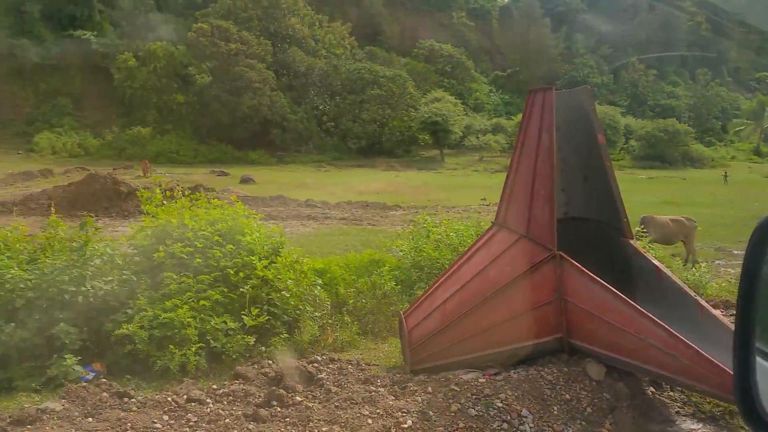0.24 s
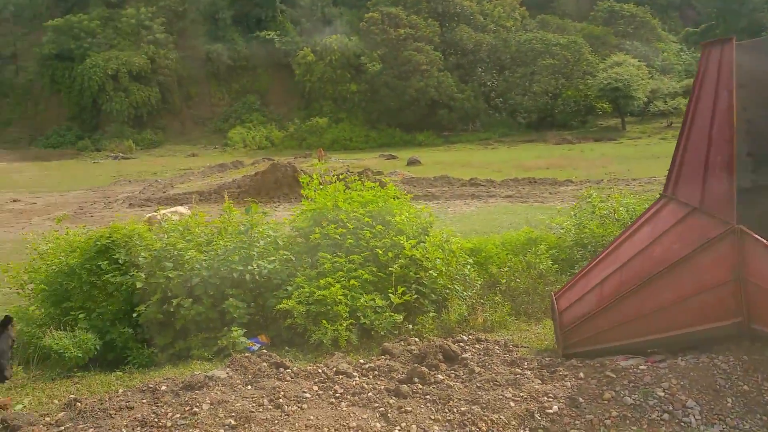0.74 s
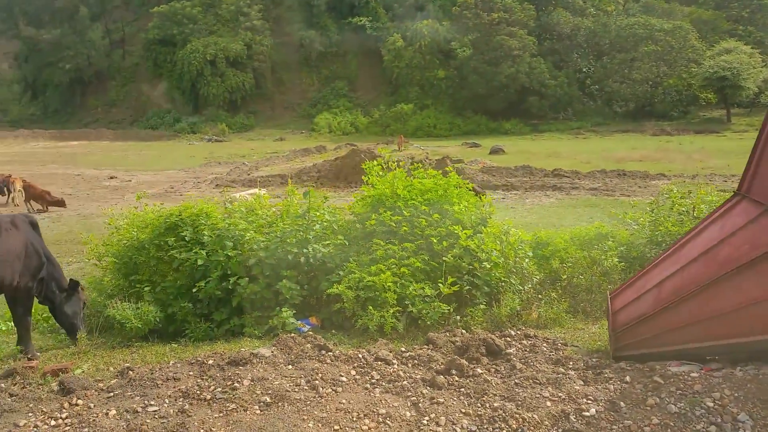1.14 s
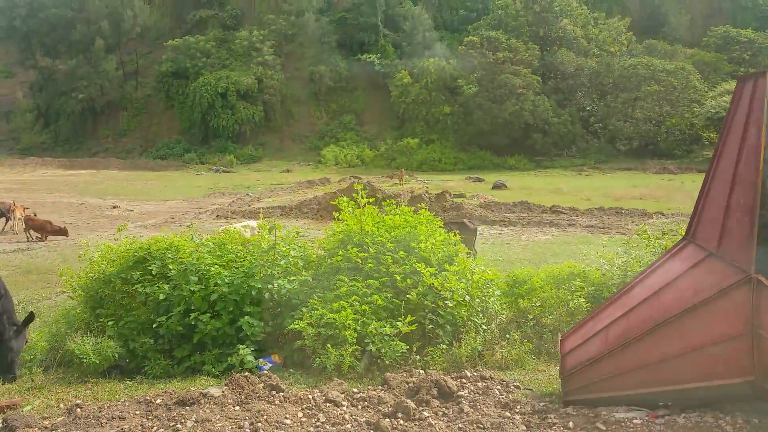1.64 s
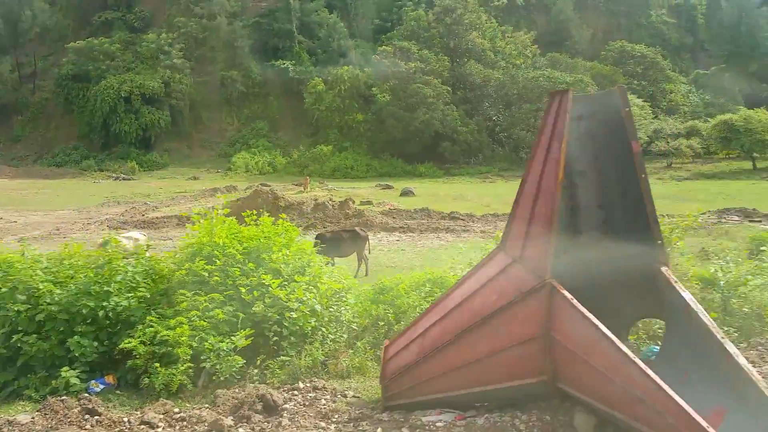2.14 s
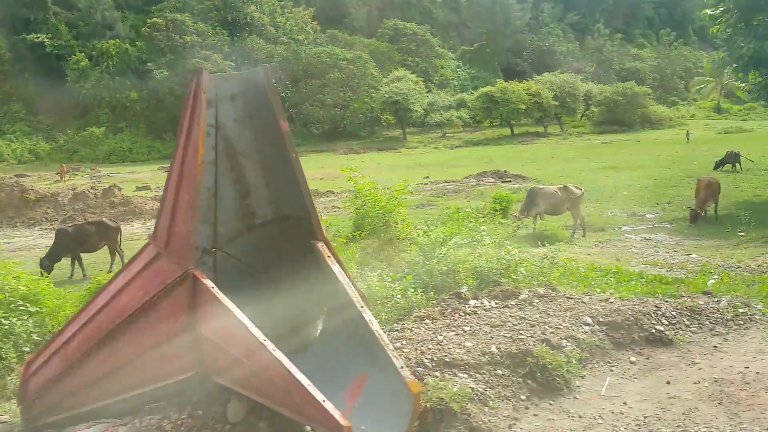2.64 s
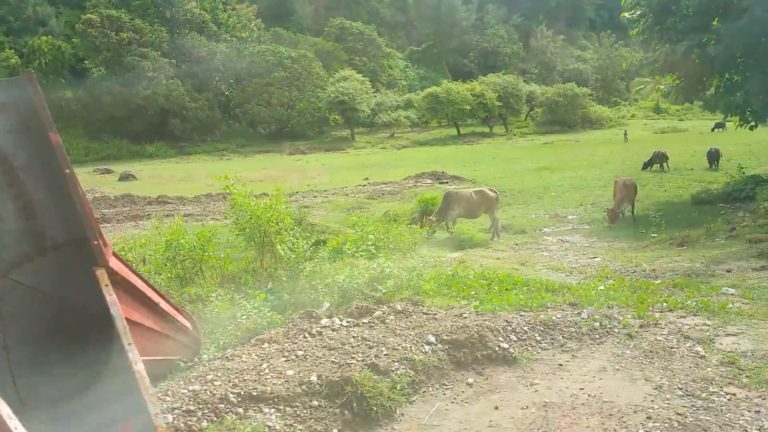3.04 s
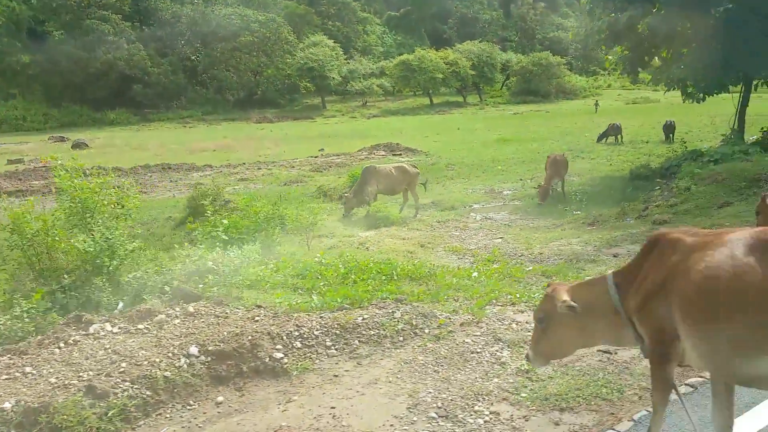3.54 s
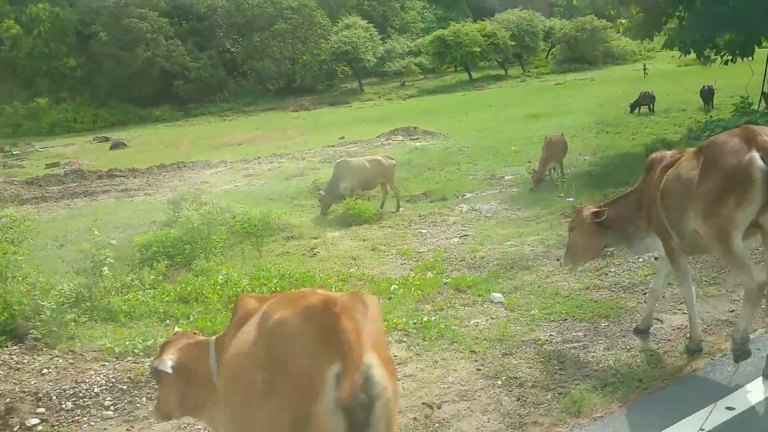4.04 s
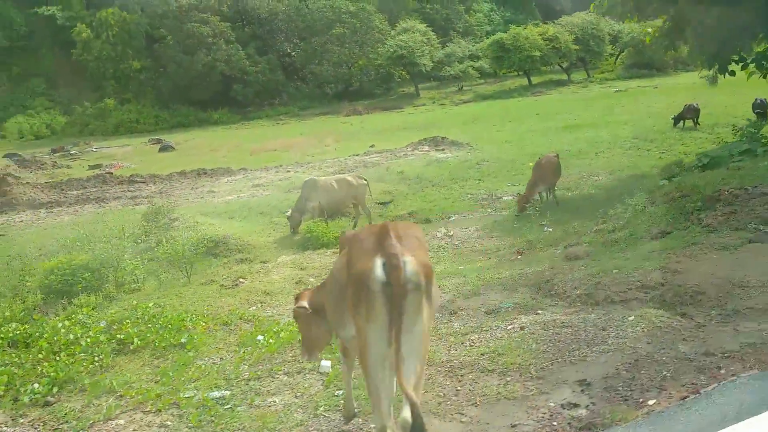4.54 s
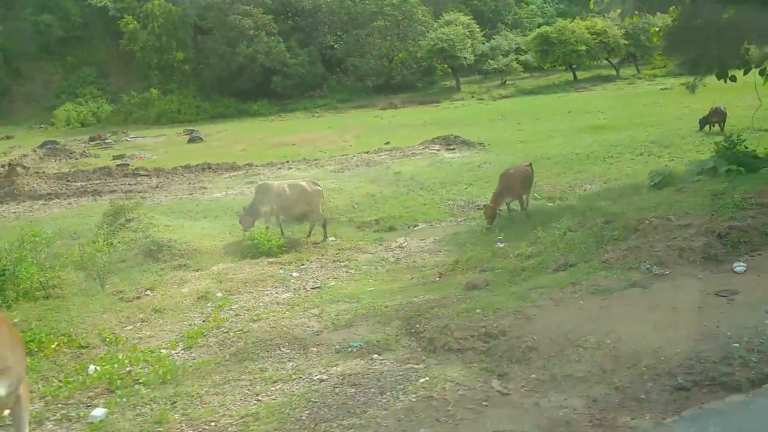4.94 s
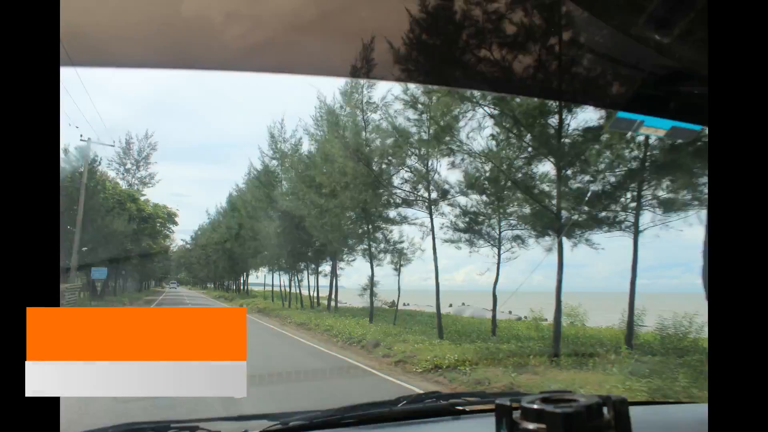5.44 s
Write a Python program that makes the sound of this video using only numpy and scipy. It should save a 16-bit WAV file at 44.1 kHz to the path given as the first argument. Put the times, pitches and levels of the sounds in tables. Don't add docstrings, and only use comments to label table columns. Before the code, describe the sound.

Inside a slow van, the engine idles then pulls away with a low boom, amid road rumble, hissing blower and faint distant horn toots.

```python
import sys
import numpy as np
from scipy import signal
from scipy.fft import rfft, irfft, next_fast_len
from scipy.io import wavfile
from scipy.ndimage import uniform_filter1d

SR = 44100
rng = np.random.default_rng(int(sys.argv[2]) if len(sys.argv) > 2 else 0)


def gain_from_db(level_db):
    decades = np.asarray(level_db, float) / 20
    return 10 ** decades


def unload_wav(signal):
    wavfile.write(
        sys.argv[1],
        SR,
        np.round(np.clip(np.atleast_2d(signal).T, -1, 1) * 32767).astype(np.int16),
    )


N = 250929
T = np.arange(N) / SR
M = next_fast_len(N)
F = np.maximum(np.fft.rfftfreq(M, 1 / SR), 1)

# start_s, firing_rate_hz, boom_db, load_db
ENGINE = [(0, 26.6, -41.5, 1), (1.2, 27, -41.5, 2), (1.7, 32.7, -50, -6), (1.81, 38.4, -41, -1.5),
          (1.83, 38.1, -45.5, -2.5), (1.88, 39.77, -30.5, -0.5), (2.0, 43.63, -18.5, -7),
          (2.25, 47.89, -24, -5.5), (2.4, 50.5, -21, -3), (2.71, 53.54, -18.5, -3.5), (2.89, 55.6, -25, -1),
          (3.94, 57.86, -22, -1.5), (4.78, 62.87, -18.5, -1.5), (4.83, 63.07, -23, -5),
          (5.15, 64.45, -23, -2), (5.19, 64.4, -26, 1.5)]
# pitch_hz, likeness (0-1), left_leads_rad, left_minus_right_db
PORTS = [(30, 0.96, -0.06, -3.5), (70, 0.84, 0.14, 2), (120, 0.98, 0.1, -1), (250, 0.99, 0.25, 0.5),
         (454, 1, 0.57, 5.5), (669, 0.1, -.5, 2), (940, 0.6, -1.63, -4), (1200, .65, -1.37, 3),
         (1430, .55, -3, -1.5), (1920, 0, -3, 3), (2300, .35, -5, -3.5), (2950, 0.05, -1.1, -1),
         (5030, 0, -1.5, -7.5), (8900, .1, -2.5, -30), (13000, .1, -6, -9)]


def walk(rate):
    hold = int(500 / rate)
    slow = np.repeat(rng.standard_normal(3000 // hold + 1), hold)
    slow = uniform_filter1d(uniform_filter1d(slow, hold), hold)
    return 1.3 * np.interp(T * 500, np.arange(len(slow)), slow)


def over_time(table):
    s, *columns = np.transpose(table)
    return [np.interp(T, s, column) for column in columns]


def over_hz(table, hz):
    f, *columns = np.transpose(table)
    return [np.interp(np.log(hz), np.log(f), column) for column in columns]


def microphone_sides():
    _, lead_rad, pan_db = over_hz(PORTS, F)
    left = gain_from_db(pan_db / 2) * np.exp(.5j * lead_rad)
    return np.array([left, 1 / left])


def ports(mono):
    return irfft(rfft(mono, M) * microphone_sides(), M)[:, :N]


def stack(turns, orders, wobble_db, slip, spread):
    total = 0
    for k, db in orders:
        strength = np.sqrt(2) * gain_from_db(db + wobble_db * walk(9))
        total = total + strength * np.cos(2 * np.pi * k * turns + slip * walk(6) + spread * k * k)
    return total


def engine():
    # multiple of the firing rate, full_load_db
    engine_orders = [(.5, -44), (1.5, -44), (2, -32.5), (2.25, -36.5), (2.75, -43), (3, -33.5), (3.25, -34),
                     (3.5, -38.5), (4, -33.5), (5, -37), (6, -44), (6.5, -57.5)]
    # pitch_hz, width_hz, lift_db
    panels = [(138.7, 6.5, 8), (185.14, 7.5, 5.5), (256.7, 11, 10.5), (285, 15, 4.5), (372.4, 27, 14),
              (396.9, 15, 18)]
    hz, boom_db, load_db = over_time(ENGINE)
    turns = np.cumsum(hz) / SR
    load_db = load_db - 9 * np.clip((50 - hz) / 22, 0, 1)
    lifted = []
    for k, db in engine_orders:
        panel_db = sum(lift_db / (1 + (2 * (k * hz - f) / width) ** 2) for f, width, lift_db in panels)
        lifted.append((k, db + load_db + panel_db))
    boom = stack(turns, [(1, boom_db)], wobble_db=.8, slip=.12, spread=0)
    return boom + stack(turns, lifted, wobble_db=1.0, slip=.18, spread=.4)


def compressor():
    # multiple of the knock rate, level_db
    knock = [(1, -46), (2, -30.5), (3, -30), (4, -33.5), (5, -28.5), (6, -34), (7, -47), (8, -45.5),
             (9, -42), (10, -50.5), (11, -51)]
    # start_s, level_db
    pumping = [(0, 0), (.7, 0), (1.3, 0.5), (1.9, -0.5), (2.5, -1.5), (3.1, 1.3), (3.7, -0.5), (4.3, -1.2),
               (4.9, -1.3), (5.2, 3.5)]
    knock_hz = 40.35
    turns = knock_hz * T + 0.029 * walk(1.49) + 0.081
    strength = gain_from_db(over_time(pumping)[0] + 1.8 * walk(30))
    return strength * stack(turns, knock, wobble_db=1.5, slip=.35, spread=.06)


def road():
    # pitch_hz, level_db (per Hz)
    cabin = [(12, -39), (20, -11.5), (49, -12), (97, -2.5), (198, -5.5), (315, -15.5), (367, -16),
             (499, -22.5), (734, -26.5), (824, -28), (1650, -31), (2000, -30.5), (2600, -67), (4400, -120)]
    # pitch_hz, level_db
    blower = [(2000, 2), (2400, 0), (3200, -8), (4200, -12), (6300, -18), (7600, -25.5), (8800, -39),
              (9800, -40), (11500, -31), (13500, -33), (15600, -35)]
    # pitch_hz, width_hz, lift_db
    ducts = [(343.6, 35, 3.5), (580, 44, 2.5), (676, 34, 5.5), (818, 31, 8), (914, 73, 6), (1328, 91, 5),
             (1489, 47, 7), (1657, 120, -3), (3020, 44, 2.5), (5250, 60, 5.5)]
    # start_s, turn_db (left minus right), outside_db (by the window), blower_db (facing it)
    phone = [(0, -2, -46, -0.5), (.1, 0.5, -45, -1), (.5, 2.5, -47.5, 1.5), (.75, .5, -48, 1.4),
             (1.14, -3, -48, 0), (1.8, -6.5, -48.5, 0), (2.26, -6, -48.5, 0), (2.67, 3, -46.5, -0.5),
             (3.75, 1.5, -46, 0), (4.11, -3, -47.5, -0.5), (4.55, -2, -48, -1.5), (5.18, -2, -48, 0.5)]
    # pitch_hz, share
    window = [(200, 0.18), (800, 1.2), (1250, 1.6), (3500, .1)]
    colour_db = over_hz(cabin, np.minimum(F, 1950))[0] + over_hz(blower, F)[0]
    colour_db = colour_db + sum(db / (1 + (2 * (F - hz) / width) ** 2) for hz, width, db in ducts)

    like = np.clip(over_hz(PORTS, F)[0], 0, 1)
    shared, left, right = rfft(rng.standard_normal((3, M)))
    noise = np.sqrt(like) * shared + np.sqrt(1 - like) * np.array([left, right])
    pair = gain_from_db(colour_db) * microphone_sides() * noise

    turn_db, outside_db, blower_db = over_time(phone)
    outside_db = outside_db - outside_db.mean()
    idle_db = -6 * np.clip((45 - over_time(ENGINE)[0]) / 12, 0, 1)
    swell = walk(1.2)
    out = 0
    for hz in 20 * 2 ** np.arange(0, 10, .5):
        band = np.cos(np.pi / 2 * np.clip(2 * np.log2(F / hz), -1, 1)) ** 2
        sound = irfft(pair * band, M)[:, :N]
        if 700 < hz < 1500:
            twist_rad = 0.1 * (turn_db + 0.5) * np.exp(-np.log2(hz / 1150) ** 2 / 0.21)
            twist_rad = np.array([[1], [-1]]) * twist_rad
            quarter_late = irfft(-1j * pair * band, M)[:, :N]
            sound = np.cos(twist_rad) * sound - np.sin(twist_rad) * quarter_late
        level_db = over_hz(window, hz)[0] * outside_db + blower_db * (hz > 3500) + idle_db * (hz < 66)
        flicker_db = .5 * swell + 0.69 * walk(7.1) + 0.68 * walk(22)
        side_db = turn_db * np.exp(-np.log2(hz / 1250) ** 2 / 1.1) / 2
        out = out + gain_from_db(level_db + flicker_db + np.array([side_db, -side_db])) * sound
    return out * gain_from_db(-24) / np.sqrt(np.mean(out ** 2))


def whistles():
    # pitch_hz, level_db, start_s, end_s
    whistle_tones = [(3030, -56, .15, 1.65), (3030, -62, 2.3, 4.1), (5250, -66, 0, .4),
                     (5250, -66, 1.05, 1.5), (5240, -63, 2.05, 2.6), (5270, -71, 3.7, 5.2),
                     (6230, -71, .7, 1.2), (1491, -54, 3.8, 4.7), (812, -56, 1.1, 5.2),
                     (681, -54, 3.9, 4.7), (935, -56, .7, 1.5)]
    out = 0
    for hz, db, start_s, end_s in whistle_tones:
        gate = np.clip(np.minimum(T - start_s, end_s - T) / 0.12, 0, 1)
        flutter = gain_from_db(db + 2.5 * walk(7) + 3.5 * walk(40))
        turns = np.cumsum(hz * (1 + .003 * walk(50))) / SR
        out = out + gate * flutter * np.sin(2 * np.pi * turns)
    return out


def trim():
    # start_s, level_db, pitch_hz
    ticks = [
        (.42, -52, 6200),
        (.56, -57, 11500),
        (2.44, -57, 7000),
        (3.272, -40, 5000),
        (3.5, -58, 8000),
        (3.72, -58, 9000),
        (4.026, -44, 5200),
    ]
    out = np.zeros((2, N))
    t = np.arange(1800) / SR
    shape = np.minimum(t / .003, 1) * np.exp(-t / .011)
    for s, db, hz in ticks:
        burst = rng.standard_normal((2, len(t))) * shape * gain_from_db(db + np.array([[-7], [1]]))
        plastic = signal.butter(2, [hz * 0.92, min(hz * 1.7, 16000)], "band", fs=SR, output="sos")
        i = int(s * SR)
        out[:, i:i + len(t)] += signal.sosfilt(plastic, burst)
    return out


def horns():
    # start_s, length_s, start_hz, end_hz, level_db
    toots = [
        (.042, .06, 530, 550, -31),
        (.16, .02, 445, 440, -34),
        (1.985, .075, 480, 565, -31),
        (2.09, .045, 545, 575, -32),
        (2.72, .04, 550, 565, -33),
        (2.975, .045, 555, 605, -33),
        (3.085, .05, 610, 550, -37),
        (3.5, .04, 520, 540, -39),
        (4.61, .09, 530, 565, -38),
        (4.98, .04, 535, 525, -37),
    ]
    out = np.zeros((2, N))
    for s, length, start_hz, end_hz, db in toots:
        pan_db = 6.5 * np.exp(-s / 1.5)
        t = np.arange(int((length + .06) * SR)) / SR
        phase = 2 * np.pi * np.cumsum(np.interp(t, [0, length], [start_hz, end_hz])) / SR
        rasp = gain_from_db(2.5 * np.sin(2 * np.pi * 47 * t))
        shape = np.minimum(t / .012, 1) * np.exp(-np.maximum(t - length, 0) / .016) * rasp
        overtone = np.sin(2 * phase)
        i = int(s * SR)
        out[0, i:i + len(t)] += gain_from_db(db + pan_db / 2) * shape * (np.sin(phase) + 0.049 * overtone)
        out[1, i:i + len(t)] += gain_from_db(db - pan_db / 2) * shape * (np.sin(phase + 1.0) + 0.045 * overtone)
    return out


def scene():
    return ports(engine() + compressor() + whistles()) + road() + trim() + horns()


def top_cut(x):
    return signal.sosfilt(signal.butter(12, 15740, fs=SR, output="sos"), x)


def record(dry):
    seam_pressure = (.095, -.08)
    stutter_at, stutter_len = 228900, 1278
    start = stutter_at - stutter_len
    order = np.arange(N)
    bass = uniform_filter1d(uniform_filter1d(dry, 60), 60)
    high = np.interp(order, [start - 150, start, start + 300], [0, 1, 0])
    sag = np.interp(order, [stutter_at - 550, stutter_at - 250], [0, 1])
    dry = dry + high * (seam_pressure[0] - bass) + sag * (seam_pressure[1] * sag - bass)
    order[stutter_at:] = start + (order[stutter_at:] - stutter_at) % stutter_len
    held = dry[:, order] * (np.arange(N) < stutter_at + 2 * stutter_len)
    treble_limit = signal.ellip(8, .1, 60, 15700, fs=SR, output="sos")
    return top_cut(signal.sosfilt(treble_limit, held))


dry = scene()
out = record(dry)
unload_wav(out)
```